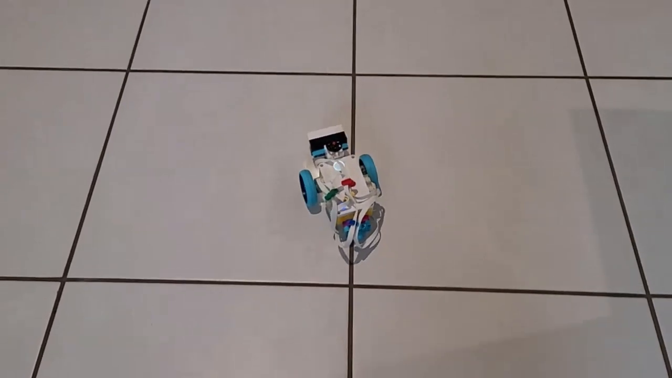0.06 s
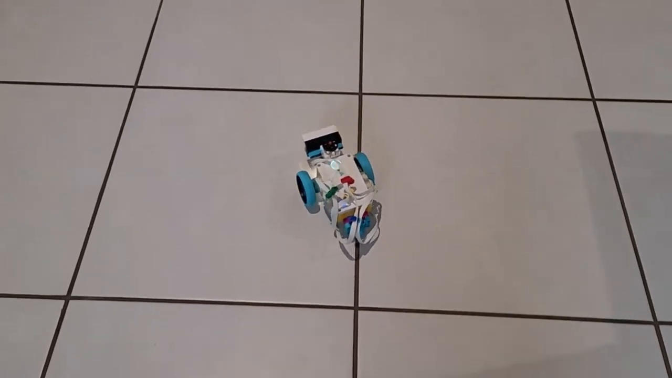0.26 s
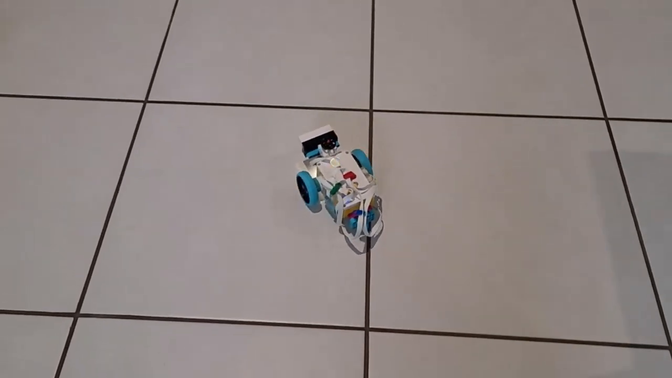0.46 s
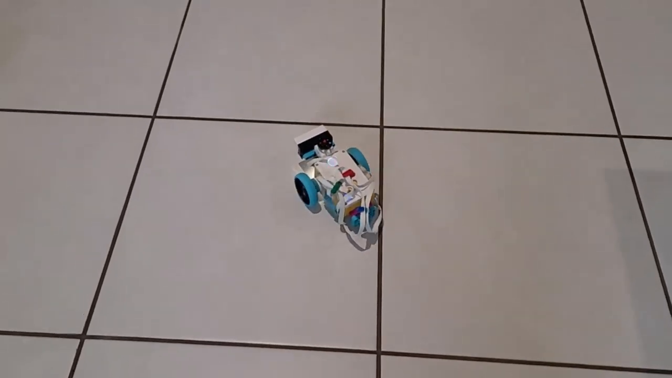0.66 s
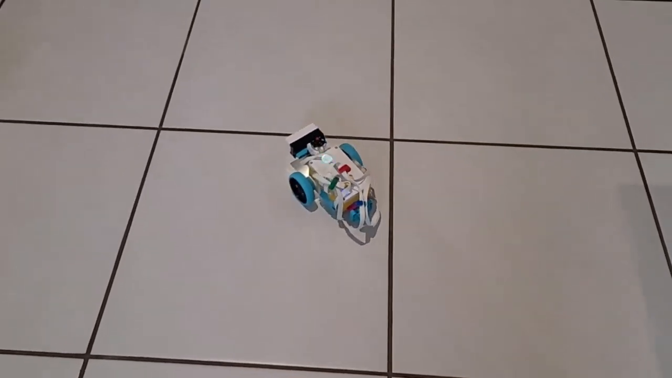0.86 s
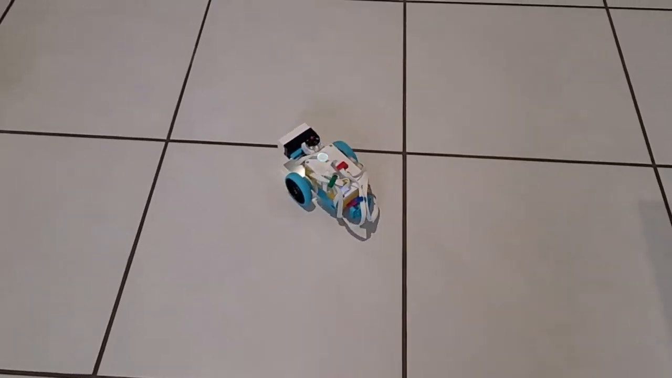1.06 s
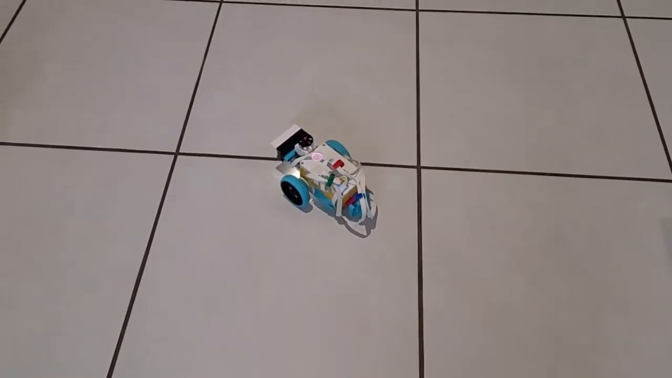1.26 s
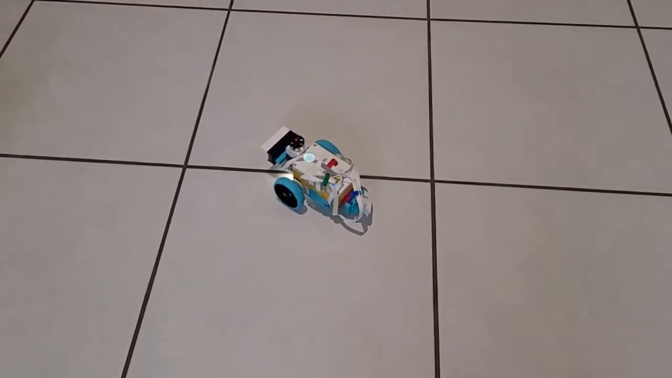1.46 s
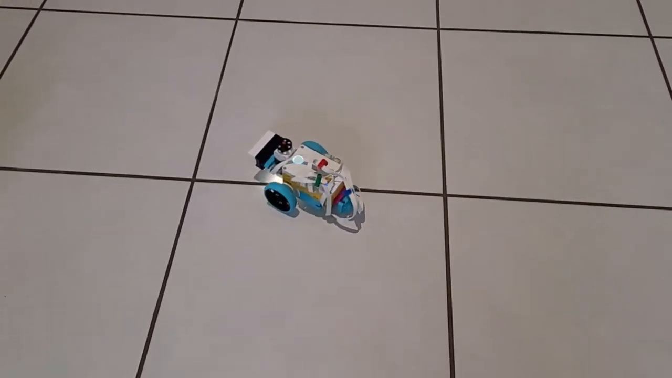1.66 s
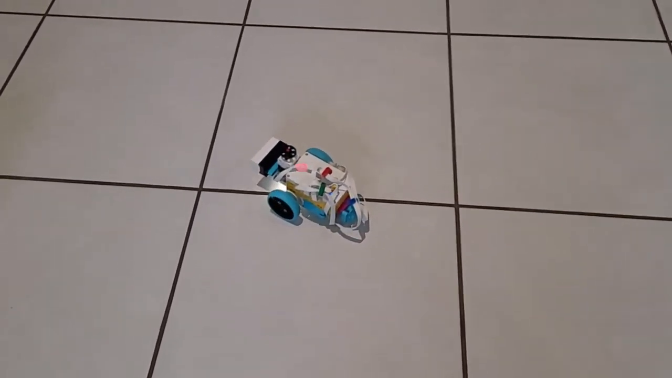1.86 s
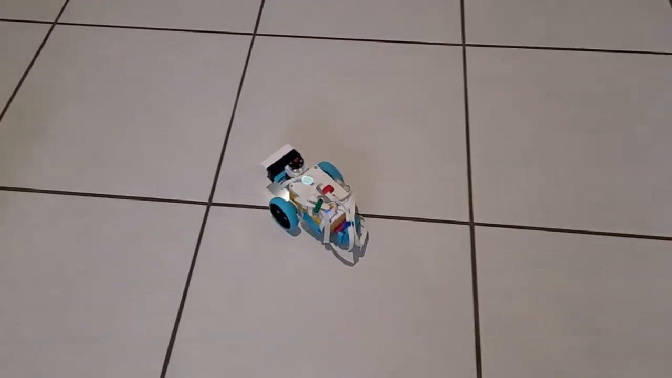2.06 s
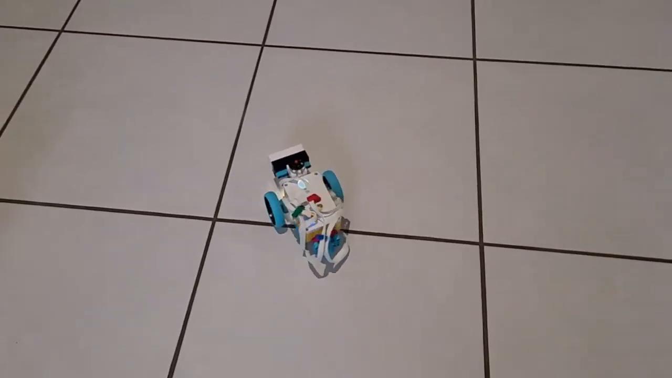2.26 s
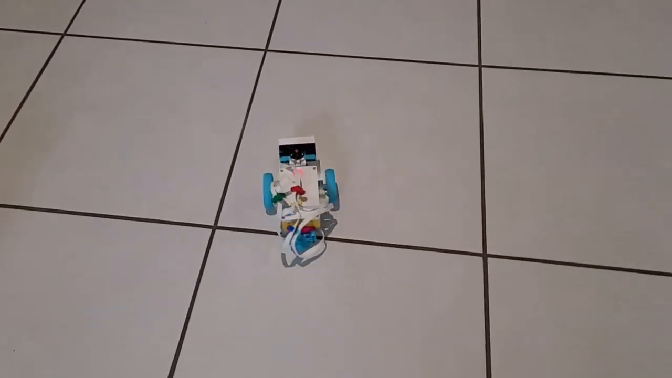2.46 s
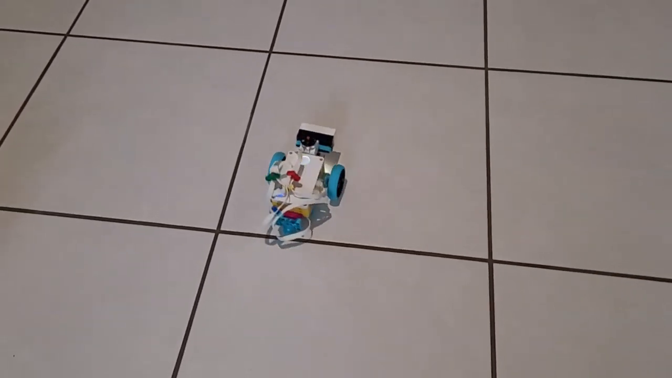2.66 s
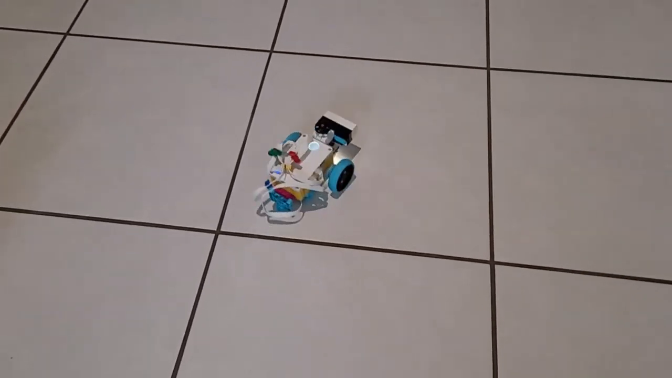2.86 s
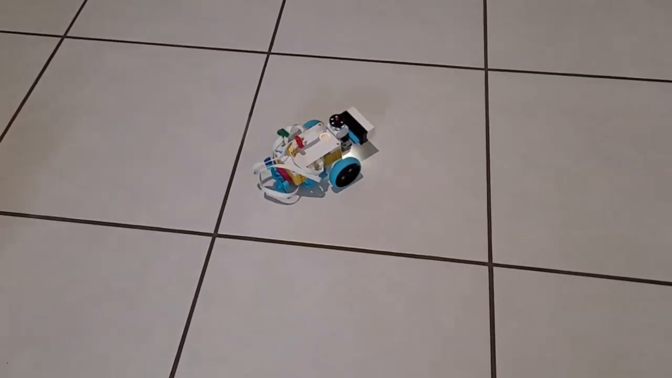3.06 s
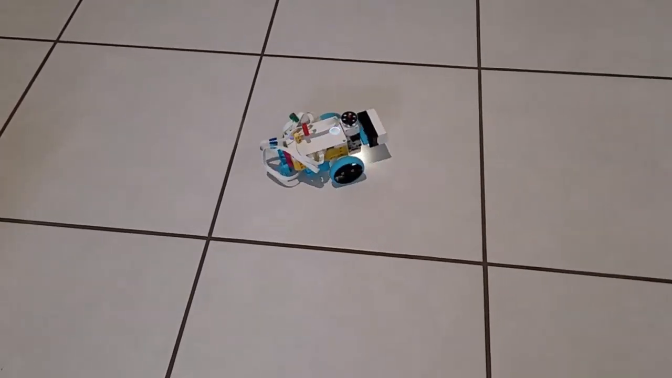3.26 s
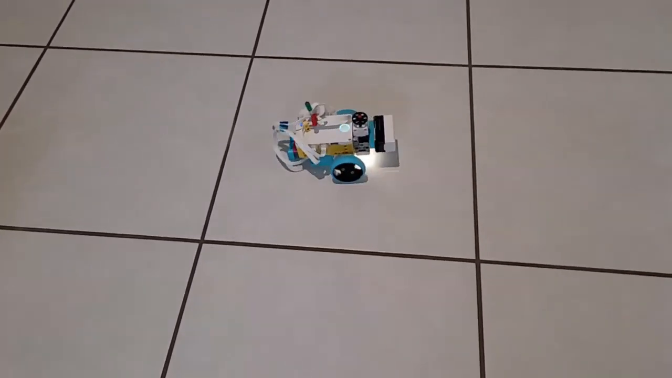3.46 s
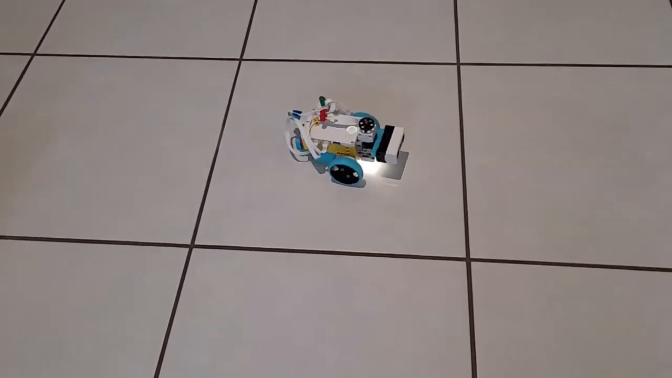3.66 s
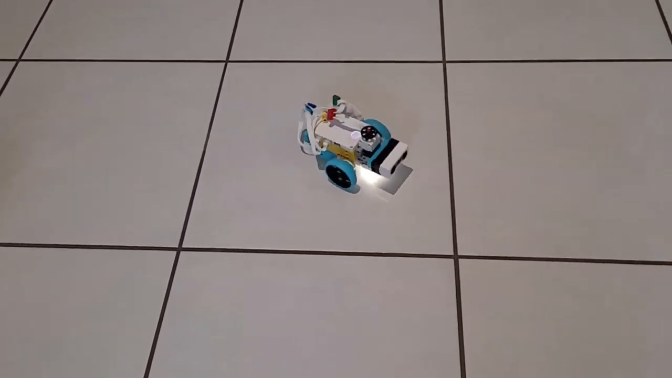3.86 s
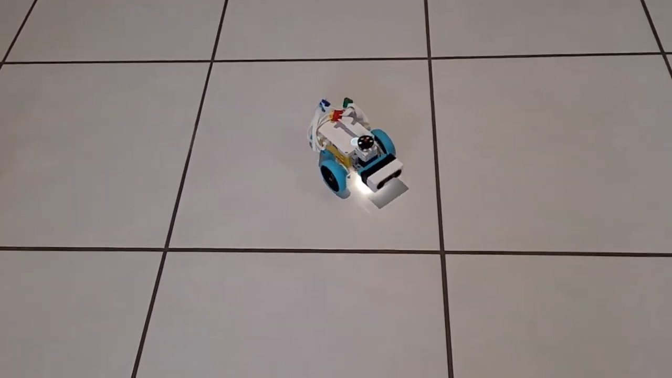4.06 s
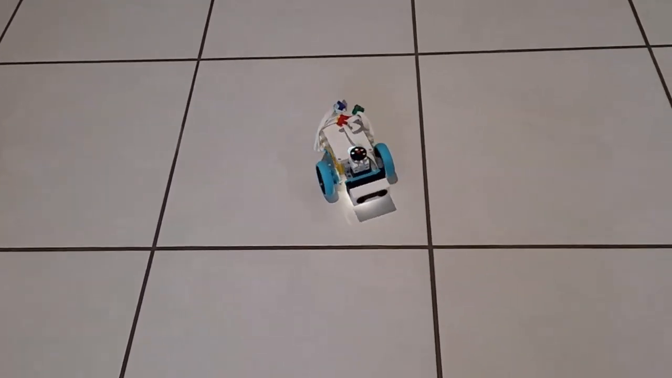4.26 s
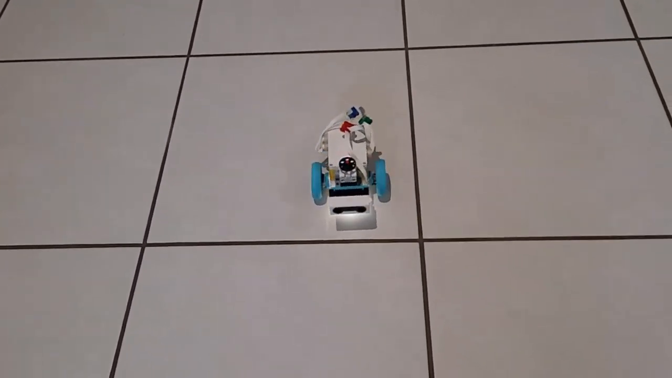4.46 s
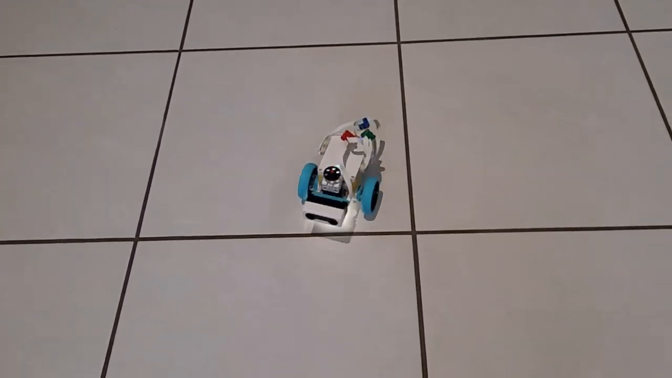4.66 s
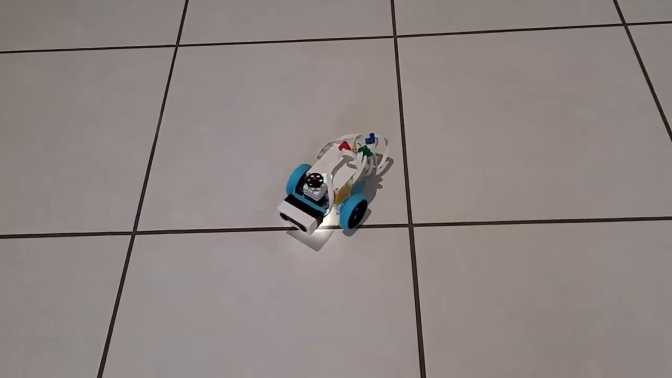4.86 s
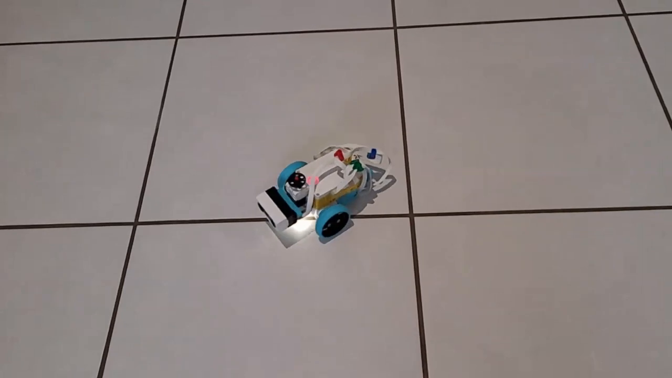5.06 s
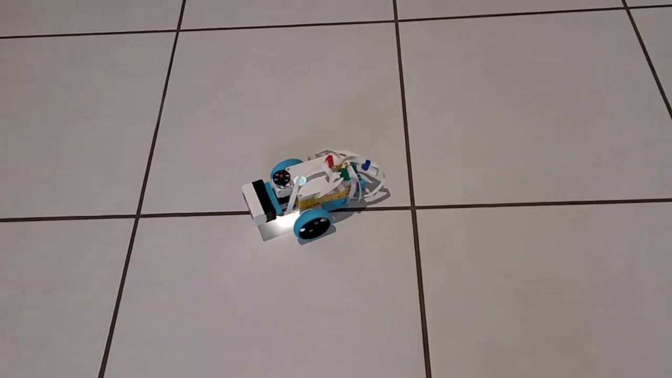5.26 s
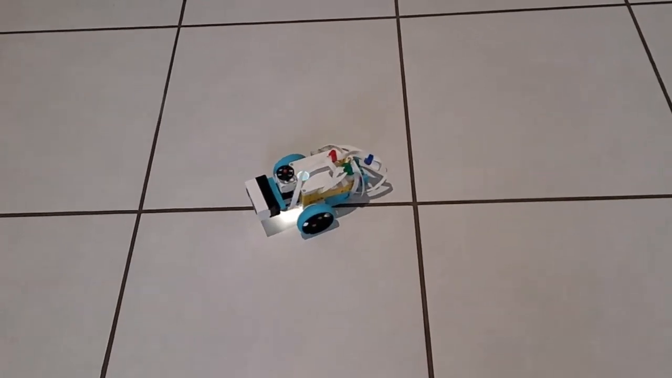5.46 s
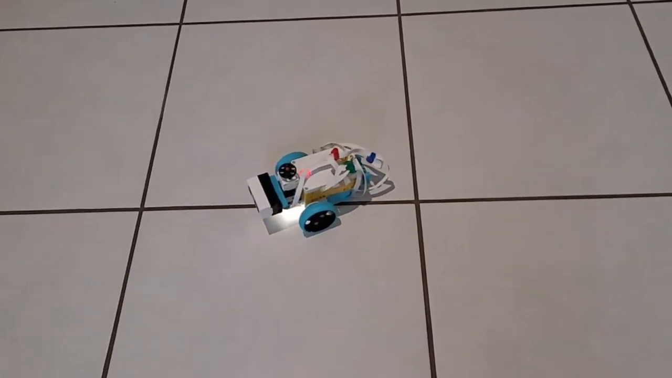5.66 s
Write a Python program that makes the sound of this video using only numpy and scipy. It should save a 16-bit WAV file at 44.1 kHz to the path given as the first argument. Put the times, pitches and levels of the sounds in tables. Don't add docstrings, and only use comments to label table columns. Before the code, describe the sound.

A small wheeled plastic robot drives on tiles in a bare, reverberant room. Its gears rattle brightly with a steady electric whine, pause briefly with a loud clack as it reverses, then whir and whistle quieter through a turn, with a few dull knocks. It stops with a small click, and two soft finger taps touch the close mono microphone.

```python
import sys
import numpy as np
from scipy import signal
from scipy.fft import rfft, irfft, next_fast_len
from scipy.io import wavfile
from scipy.ndimage import uniform_filter1d

SR = 44100
rng = np.random.default_rng(int(sys.argv[2]) if len(sys.argv) > 2 else 0)


def generate_wav(signal):
    frames = np.transpose(np.atleast_2d(signal))
    scaled = np.clip(frames, -1, 1) * 32767
    pcm = np.round(scaled).astype(np.int16)
    wavfile.write(sys.argv[1], SR, pcm)


def attenuation_scalar(level_db):
    decades = np.asarray(level_db, float) / 20
    return 10 ** decades


N = 251811

# start_s, motor_effort_db, tail_turned_to_microphone_0_to_1
FORWARD = [(0.0, -39.5, 0.84), (.4, -39.5, 1), (.9, -39, 0.84), (1.3, -41, 0.86), (1.62, -39, 0.8),
           (1.72, -42.5, 0.66)]
TURNING = [(1.88, -54, 0.63), (2.0, -45.5, 0.51), (2.12, -41, 0.63), (2.5, -38.5, 0.58), (2.9, -43, 0.54),
           (3.15, -43, 0.51), (3.8, -43.5, 0.28), (4.3, -42.5, 0.25), (4.6, -42.5, 0.14), (4.9, -41.5, .08),
           (5.12, -43, .02), (5.25, -45.5, .02)]
# on_s, off_s
POWERED = [
    (0.0, 1.78),
    (2.049, 5.26),
]
# pitch_hz, width_hz, front_level_db, tail_level_db
SHELL = [(1902, 255, -5.5, -10), (2159, 237, -1, -5), (2400, 230, 0, -2.5), (2660, 280, -1.5, 2),
         (2900, 337, -3, -0.5), (3212, 410, -12, -14.5)]
CHASSIS = [(704, 156, -22.5, -16), (994, 157, -9, -3), (1114, 135, -3, -5), (1245, 113, 0.5, 2.5),
           (1360, 122, -4.5, -0.5), (1646, 370, -13.5, -7.5)]
GEAR_CASE = [(3577, 900, -9, -6), (4480, 890, -13.5, -10), (4874, 330, -3, 0), (5390, 1430, -10, -7.5),
             (6180, 1090, 2, 0), (7430, 1150, -7, -8), (8350, 710, -7, -5)]
BRUSH_HISS = [(9700, 2100, -9.5, -9.5), (10830, 920, -2.5, 2), (11410, 1700, -3, -3),
              (12900, 1440, -8.5, -8), (14800, 2000, -26.5, -16.5)]
# tail_turned_0_to_1, chassis_db, gear_case_db, brush_hiss_db (all re shell)
PARTS_BY_HEADING = [(0, -5.5, -1, -1.5), (.35, -6, -3.5, -4.5), (.7, -5.5, -2.5, -1), (.9, -5.5, -4, -2.5)]
# start_s, beats_per_s, depth_0_to_1
BRUSH_BEAT = [(0, 460, 0.8), (1.7, 560, 0.4), (2.1, 250, 0.2), (3.4, 370, 0.2), (5.3, 335, 0.28)]
TEETH_PER_S, TEETH_SPREAD_DB = 5000, 2.5
COAST_S, IDLE_CASE_DB, IDLE_BRUSH_DB = 0.042, 1, -5.5

# tail_turned_0_to_1, then level_db of multiples 1, 2, 3, 4 of the chopping rate
WHINE_BY_HEADING = [(0, -58, -45.5, -63.5, -75), (.3, -50, -54.5, -70, -82), (.42, -58.5, -56, -64, -84),
                    (.7, -55.5, -63.5, -74.5, -79), (.9, -62, -58, -73, -68.5)]
# rate_hz, depth_0_to_1, unsteadiness_hz
WHINE_SWAY = [(49.2, 0.19, 6), (249.3, 0.2, 14.4)]
CHOP_HZ, WHINE_T60_S = 1200.2, 0.69
WHINE_FADING_DB, FADINGS_PER_S = 1.3, 3

# start_s, pitch_hz, level_db
SING_LEFT = [(2.2, 2770, -58), (2.28, 2815, -42), (2.38, 2920, -50), (2.5, 2900, -62), (2.62, 2860, -48),
             (2.7, 2795, -42), (2.82, 2770, -43.5), (2.98, 2720, -48), (3.05, 2800, -60)]
SING_RIGHT = [(2.3, 2640, -54), (2.36, 2676, -40), (2.46, 2704, -49), (2.75, 2695, -47), (2.95, 2685, -47),
              (3.25, 2660, -47.5), (3.7, 2640, -61), (3.9, 2660, -45), (4.15, 2630, -59)]
SING_CASE = [(4.0, 4840, -65), (4.25, 4835, -54), (4.9, 4830, -53), (5.2, 4760, -63)]
SING_WIDTH_HZ, SING_WANDER_HZ = 45, 9

# start_s, peak_db, low_mode_share_db, pitch_factor
REVERSAL = [
    (1.8082, -17, -18, .93),
    (1.81, -8, -11, 1.037),
    (1.8146, -17, -14, 1.04),
]
REBOUNDS = [
    (1.8138, -36, -13, 0.91),
    (1.8217, -35, -16, 1.4),
]
KNOCKS = [(1.619, -42, 8.1, 1.0), (2.079, -41, 11, 1.0), (2.636, -32, 6, .84), (2.648, -28.5, 5.9, .96),
          (2.658, -28, 2.8, 0.99), (2.674, -40, 6, 0.95), (2.751, -40, 8.2, 0.89), (2.814, -41.5, 13, 0.89)]
STOP = [
    (5.3185, -35, -18, 1.06),
    (5.3204, -23, -16, 1.036),
    (5.334, -31, -12, 1.064),
]
# treble_share_db, crack_share_db
HIT_KINDS = [
    (-5.5, -14),
    (-9.5, -0.5),
    (-15.5, -12),
    (-38, -15.5),
]
# pitch_hz, level_db, t60_s
CLACK_LOW = [(774, -15.5, 0.0073), (1013, -17.5, 0.013), (1310, 3, 0.01), (1494, -13, .012)]
CLACK_MID = [(2825, 1.5, 0.0096), (2900, -3.5, 0.0074)]
CLACK_HIGH = [(4086, -12, .01), (4750, 0, .016), (5650, -10, .01), (8250, -20, .006), (11500, -15, .006)]
# pitch_hz, density_db_per_hz
CRACK = [(500, -28.5), (1000, 2.5), (2000, -11.5), (3500, -6.5), (6000, -9.5), (9000, -17.5), (12000, -6.5),
         (13500, -26), (15500, -36)]
CRACK_T60_S, BLOW_S = 0.015, 0.0018

# start_s, peak_db, pitch_hz, t60_s, thud_db
TAPS = [
    (5.4913, -36.5, 400, 0.013, -58),
    (5.5148, -33, 335, 0.012, -42),
]
THUD_HZ, THUD_T60_S = 60.5, 0.2

# start_s, level_db, low_share_db, treble_share_db, pitch_factor
SCATTERED = [
    (1.811, -5, -4, -1.5, 1.02),
    (2.651, -30, 10, -6, 0.86),
    (5.321, -27.5, 1, -11, 0.914),
]
# pitch_hz, density_db_per_hz
SCATTER_COLOUR = [(300, -58), (600, -25), (980, -14.5), (1300, -9), (1900, -18.5), (2450, -25), (2950, -1),
                  (3450, -17.5), (4750, -11), (5200, -12), (5750, -12), (9000, -34), (12000, -28),
                  (15500, -44)]
# pitch_hz, t60_s
ROOM_DECAY = [(300, 0.68), (1000, 0.64), (2800, 0.74), (6000, 0.73), (11000, 0.49)]
# delay_s, level_db
WALLS = [(.0042, -8.5), (0.0103, -15.5), (0.017, -15.5), (0.026, -16.5)]
MOTOR_WET_DB, CLACK_WET_DB = -0.78, -11

# pitch_hz, width_hz, front_level_db, tail_level_db
ROLL_BODY = [(254.5, 52, 4.5, -1), (400, 380, -8.5, 1), (480.4, 23, 7, 3), (520, 190, -10, 6.5)]
# centre_s, half_length_s, level_db
SCUFFS = [
    (0.306, 0.076, -64.5),
    (1.616, 0.079, -57.5),
    (2.473, 0.18, -62),
    (4.35, 0.087, -66),
    (5.02, 0.18, -63.5),
]
# pitch_hz, density_db_per_hz
RUMBLE = [(20, -28), (32, -9.5), (47, 1.5), (70, -3.5), (100, -3), (170, -13.5), (270, -12), (600, -22.5),
          (1700, -31.5), (2840, -29.5), (3820, -34.5), (15500, -34)]
ROLL_DB, ROLL_UNEVEN_DB, ROLL_FALL_DB_PER_S, ROLL_END_S = -62.5, 2, -2, 5.4
RUMBLE_DB = -63


def evened(x):
    return x / np.sqrt(np.mean(x ** 2) + 1e-20)


def read(points, hz):
    f, value = np.transpose(points)
    return np.interp(np.log(hz + 1), np.log(f + 1), value)


def shaped(size, points):
    colour = attenuation_scalar(read(points, np.fft.rfftfreq(size, 1 / SR)))
    return evened(irfft(rfft(rng.standard_normal(size)) * colour, size))


def drift(per_s):
    width = int(SR / per_s)
    smooth = uniform_filter1d(rng.standard_normal(N), width)
    return evened(uniform_filter1d(smooth, width))


def columns(*tables):
    t, rows = np.arange(N) / SR, np.vstack(tables)
    gate = sum((t >= table[0][0]) & (t <= table[-1][0]) for table in tables)
    curves = [np.interp(t, rows[:, 0], c) for c in rows.T[1:]]
    return curves, uniform_filter1d(gate * 1., size=1200)


def by_heading(table):
    turned, rows = columns(FORWARD, TURNING)[0][1], np.array(table)
    return [np.interp(turned, rows[:, 0], c) for c in rows.T[1:]]


def current(early_s):
    return columns(*[[(on, 1), (off - early_s, 1)] for on, off in POWERED])[1]


def ring(x, modes, turned):
    size = next_fast_len(len(x) + 8192)
    hz, spectrum = np.fft.rfftfreq(size, 1 / SR), rfft(x, size)
    shapes = np.array([(-1) ** k / (1 + 2j * (hz - f) / w) ** 2 for k, (f, w, *_) in enumerate(modes)])
    front_db, tail_db = np.transpose(modes)[2:]
    front = evened(irfft(spectrum * (attenuation_scalar(front_db) @ shapes), size)[:len(x)])
    tail = evened(irfft(spectrum * (attenuation_scalar(tail_db) @ shapes), size)[:len(x)])
    return (1 - turned) * front + turned * tail


def add(mix, s, sound):
    part = mix[round(s * SR):][:len(sound)]
    part += sound[:len(part)]


def teeth():
    size_db = TEETH_SPREAD_DB * np.minimum(rng.exponential(1, N), 5)
    size = attenuation_scalar(size_db) * rng.choice([-1, 1], N)
    knocks = evened(size * (rng.random(N) < TEETH_PER_S / SR))
    return evened(knocks + 0.49 * rng.standard_normal(N))


def gears():
    (shell_db, turned), gate = columns(FORWARD, TURNING)
    idle = 1 - current(COAST_S)
    chassis_db, case_db, brush_db = by_heading(PARTS_BY_HEADING)
    (per_s, depth), _ = columns(BRUSH_BEAT)
    beat = 1 + depth * np.cos(2 * np.pi * np.cumsum(per_s * (1 + .012 * drift(8))) / SR)
    chassis_db = chassis_db + 0.8 * drift(40) + 0.4 * drift(2.3)
    shell = attenuation_scalar(0.78 * drift(43)) * ring(teeth(), SHELL, turned)
    chassis = attenuation_scalar(chassis_db) * ring(teeth(), CHASSIS, turned)
    case = attenuation_scalar(case_db + IDLE_CASE_DB * idle) * ring(teeth(), GEAR_CASE, turned)
    brush = attenuation_scalar(brush_db + IDLE_BRUSH_DB * idle) * beat * ring(teeth(), BRUSH_HISS, turned)
    load_db = shell_db - 4.0 + 1.03 * drift(54) + 0.83 * drift(4.8)
    return gate * attenuation_scalar(load_db) * (shell + chassis + case + brush)


def whine():
    gate, keep = current(0), attenuation_scalar(-60 / WHINE_T60_S / SR)
    lingering = signal.lfilter([1 - keep], [1, -keep], gate)
    gate = np.maximum(gate, 0.34 * lingering)
    sway = 1
    for hz, depth, loose_hz in WHINE_SWAY:
        sway = sway + depth * np.cos(2 * np.pi * np.cumsum(hz + loose_hz * drift(7.93)) / SR)
    turns, tones = np.arange(N) * CHOP_HZ / SR, np.zeros(N)
    for multiple, db in enumerate(by_heading(WHINE_BY_HEADING), 1):
        level = attenuation_scalar(db + WHINE_FADING_DB * drift(FADINGS_PER_S) + 0.5 * drift(15))
        tones += level * np.sin(2 * np.pi * multiple * turns)
    return np.sqrt(2) * gate * sway * tones


def sing(rows, width_hz, steady):
    (hz, db), gate = columns(rows)
    fuzz = steady + 0.82 * (drift(width_hz) + 1j * drift(width_hz))
    phase = 2 * np.pi * np.cumsum(hz + SING_WANDER_HZ * drift(14)) / SR
    return gate * attenuation_scalar(db) * (fuzz * np.exp(1j * phase)).real


def singing():
    trains = sing(SING_LEFT, SING_WIDTH_HZ, .8) + sing(SING_RIGHT, SING_WIDTH_HZ, .8)
    return trains + sing(SING_CASE, 240, .1)


def struck(modes, pitch, t):
    return sum(attenuation_scalar(db - 60 * t / t60) * np.sin(2 * np.pi * hz * pitch * t) for hz, db, t60 in modes)


def clacks():
    t, out = np.arange(2000) / SR, np.zeros(N)
    rise = 1 - np.exp(-(t / BLOW_S) ** 2)
    for hits, (high_db, crack_db) in zip((REVERSAL, REBOUNDS, KNOCKS, STOP), HIT_KINDS):
        for s, db, low_db, pitch in hits:
            low = attenuation_scalar(low_db) * struck(CLACK_LOW, pitch, t)
            mid = struck(CLACK_MID, pitch, t)
            high = attenuation_scalar(high_db) * struck(CLACK_HIGH, 1, t)
            crack = attenuation_scalar(crack_db - 60 * t / CRACK_T60_S) * shaped(len(t), CRACK)
            add(out, s, attenuation_scalar(db + 10.0) * rise * (mid + low + high + crack))
    return out


def taps():
    t, out = np.arange(12000) / SR, np.zeros(N)
    for s, db, hz, t60, thud_db in TAPS:
        turns = hz * (t + .001 * (1 - np.exp(-t / 0.00029)))
        knock = -attenuation_scalar(db - 60 * t / t60) * np.sin(2 * np.pi * turns) * (1 - np.exp(-t / 0.00038))
        swell = 1 - np.exp(-(t / 0.018) ** 2)
        thud = attenuation_scalar(thud_db - 60 * t / THUD_T60_S) * np.sin(2 * np.pi * THUD_HZ * (t - .011)) * swell
        add(out, s, knock + thud)
    return out


def scattered():
    hz, out = np.fft.rfftfreq(1024, 1 / SR), np.zeros(N)
    for s, db, low_db, high_db, pitch in SCATTERED:
        colour_db = read(SCATTER_COLOUR, hz / pitch) + low_db * (hz < 1900) + high_db * (hz > 3500)
        pulse = np.fft.fftshift(irfft(attenuation_scalar(colour_db)))
        add(out, s - 512 / SR, attenuation_scalar(db) * pulse / np.linalg.norm(pulse))
    return out


def room():
    slots = np.arange(280, SR - 20, 20)
    sparse = np.zeros(SR)
    sparse[slots + rng.integers(0, 20, len(slots))] = rng.choice([-1., 1.], len(slots))
    hz, t, z = signal.stft(sparse, SR, nperseg=256)
    decay = attenuation_scalar(-60 * t / read(ROOM_DECAY, hz)[:, None])
    tail = signal.istft(z * decay, SR, nperseg=256)[1]
    tail = tail / np.linalg.norm(tail)
    for s, db in WALLS:
        add(tail, s * rng.uniform(.9, 1.1), attenuation_scalar([db]))
    return tail


def reverberation(motors, hits):
    sent = attenuation_scalar(MOTOR_WET_DB) * motors + attenuation_scalar(CLACK_WET_DB) * hits + 2.92 * scattered()
    lead = sent[:SR // 2][::-1]
    sent = np.r_[lead, sent]
    place = np.pi * np.arange(len(sent)) / SR / .22
    wet = sum(signal.fftconvolve(sent * np.cos(place + k * np.pi / 3), room()) for k in range(3))
    return wet[len(lead):][:N] * np.sqrt(2 / 3)


def wheels():
    t = np.arange(N) / SR
    roll_db = ROLL_DB + ROLL_FALL_DB_PER_S * t + ROLL_UNEVEN_DB * drift(15)
    roll = attenuation_scalar(roll_db) * (t < ROLL_END_S)
    for s, half_s, db in SCUFFS:
        roll += attenuation_scalar(db) * np.exp(-((t - s) / half_s) ** 2)
    turned = np.clip(1.6 - t / 1.63, 0, 1)
    return attenuation_scalar(-5.0) * roll * ring(rng.standard_normal(N), ROLL_BODY, turned)


def background():
    return attenuation_scalar(RUMBLE_DB + 1.5 * drift(9.7)) * shaped(N + 1, RUMBLE)[:N]


def scene():
    motors, hits = gears(), clacks()
    robot = motors + whine() + singing() + hits + wheels()
    mix = robot + reverberation(motors, hits) + taps() + background()
    return np.tile(mix, (2, 1))


def top_cut(x):
    return signal.sosfilt(signal.butter(12, 15640, fs=SR, output="sos"), x)


def record(dry):
    return top_cut(dry)


dry = scene()
out = record(dry)
generate_wav(out)
```